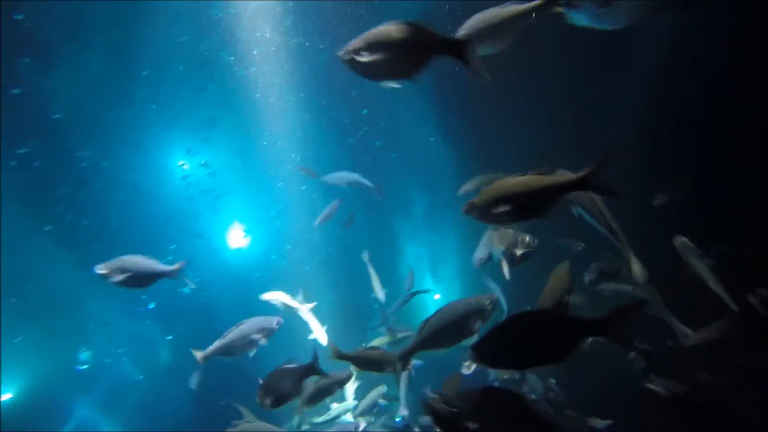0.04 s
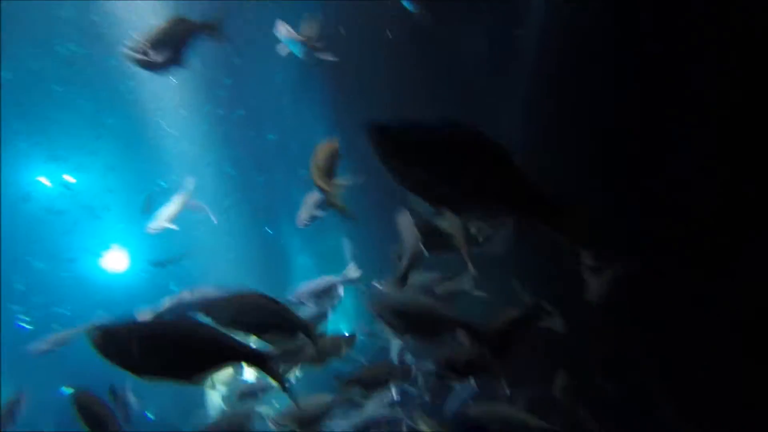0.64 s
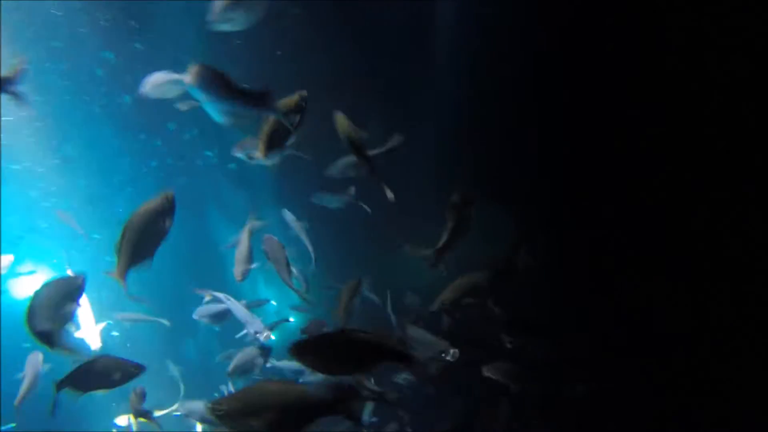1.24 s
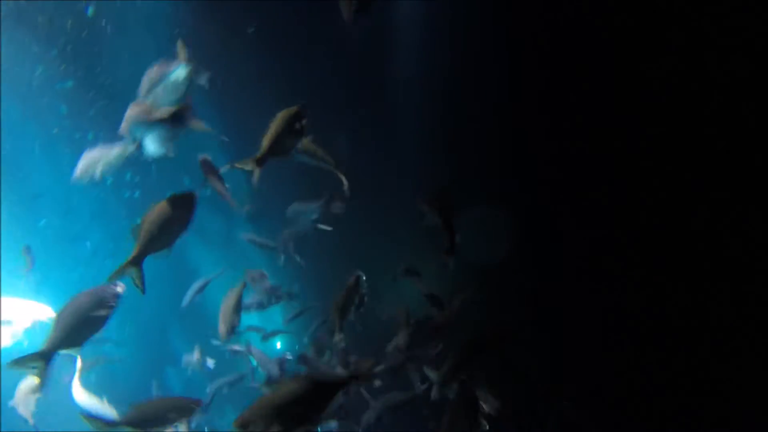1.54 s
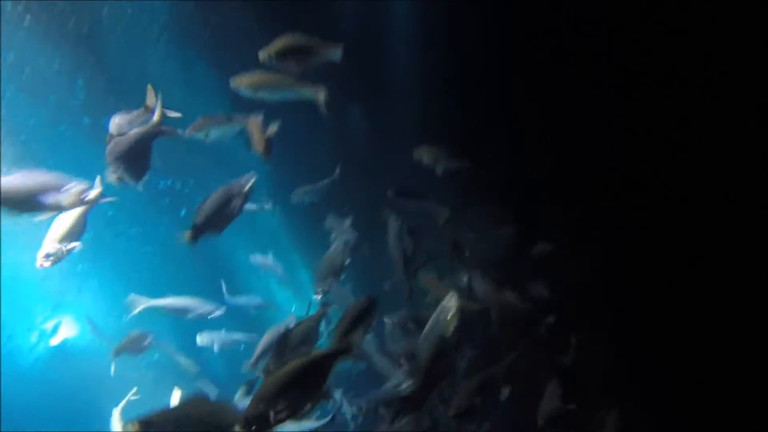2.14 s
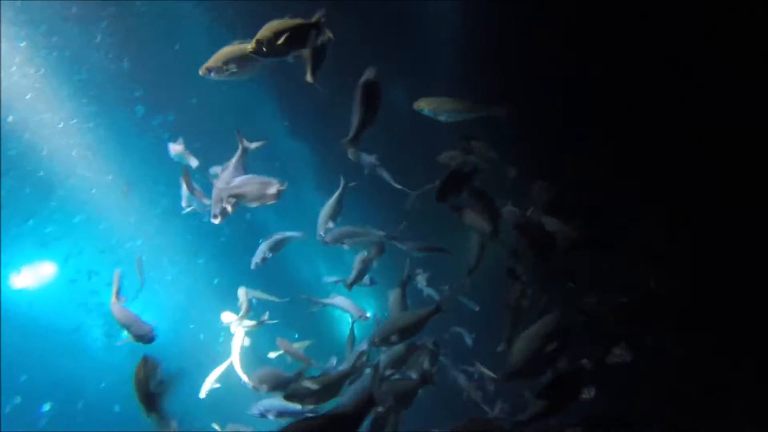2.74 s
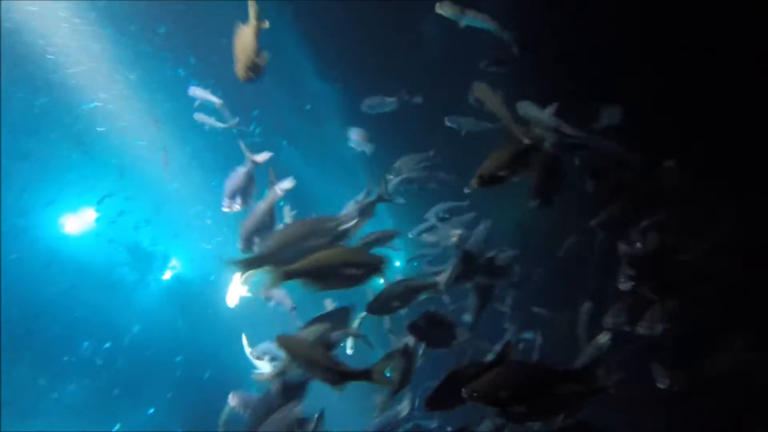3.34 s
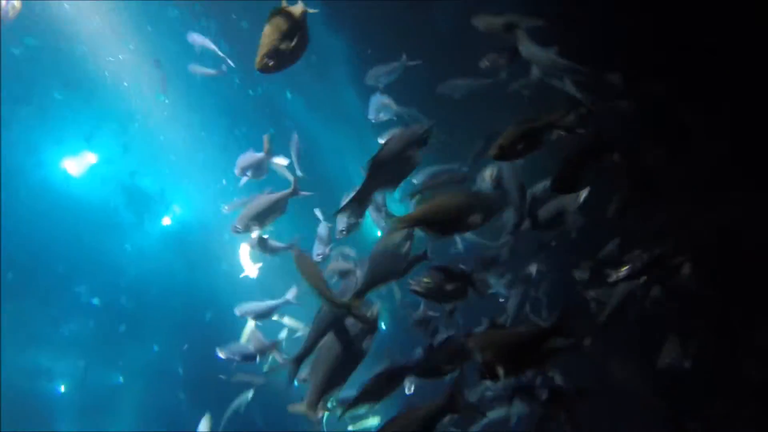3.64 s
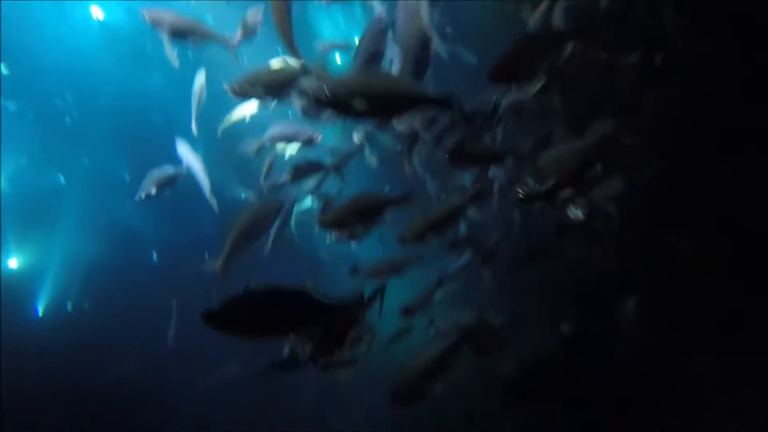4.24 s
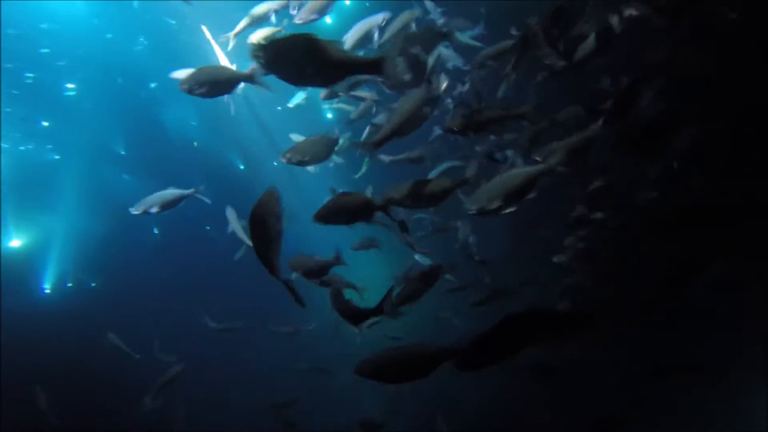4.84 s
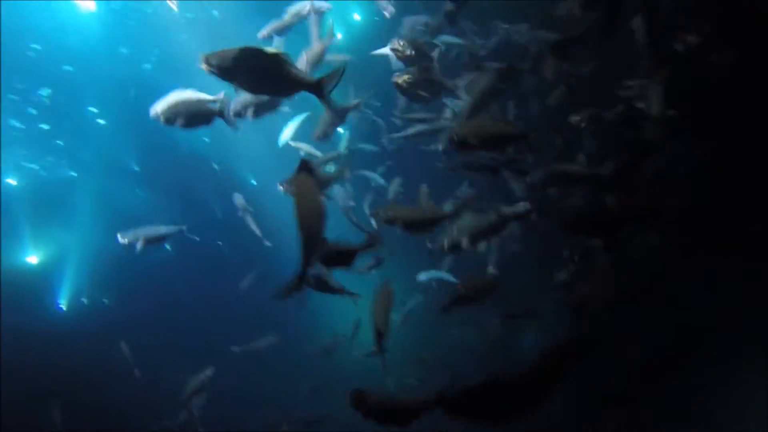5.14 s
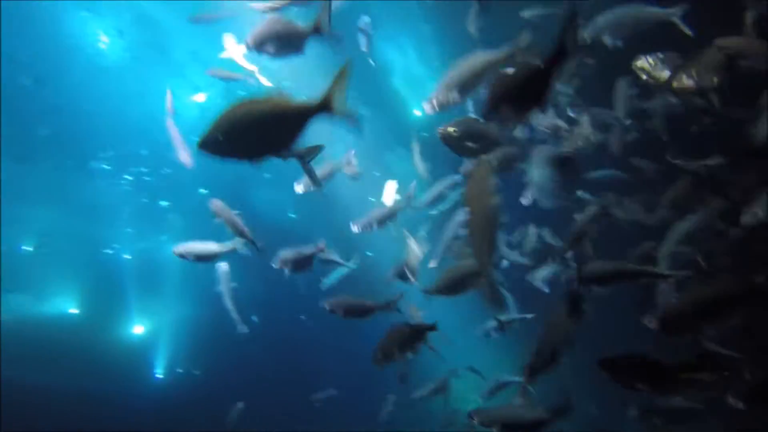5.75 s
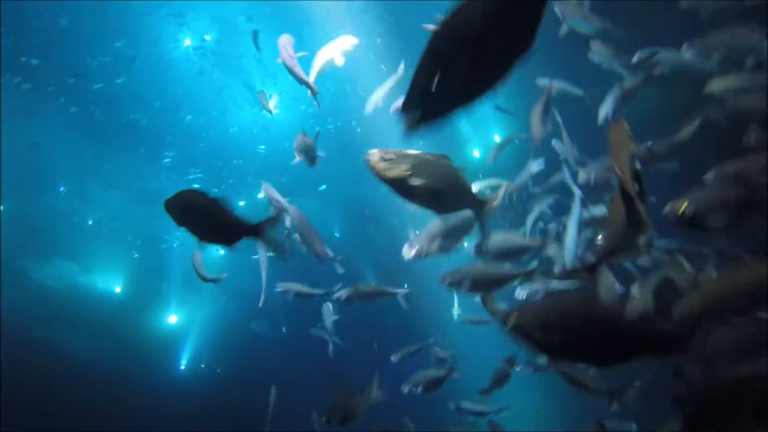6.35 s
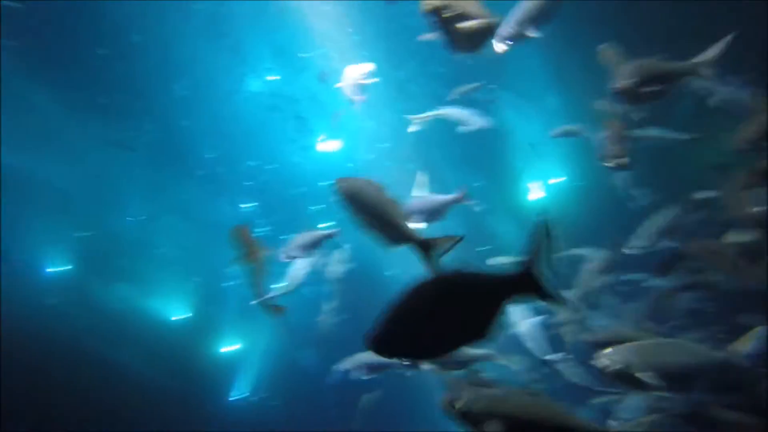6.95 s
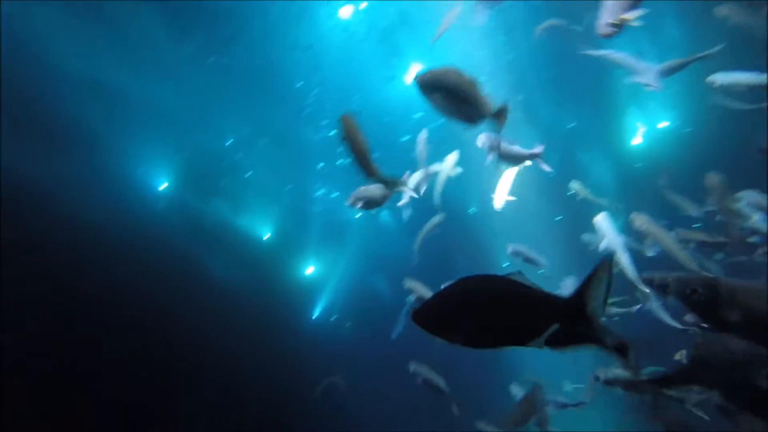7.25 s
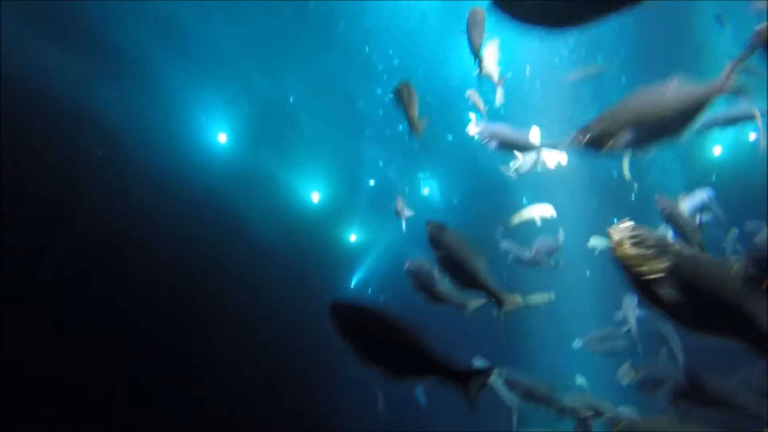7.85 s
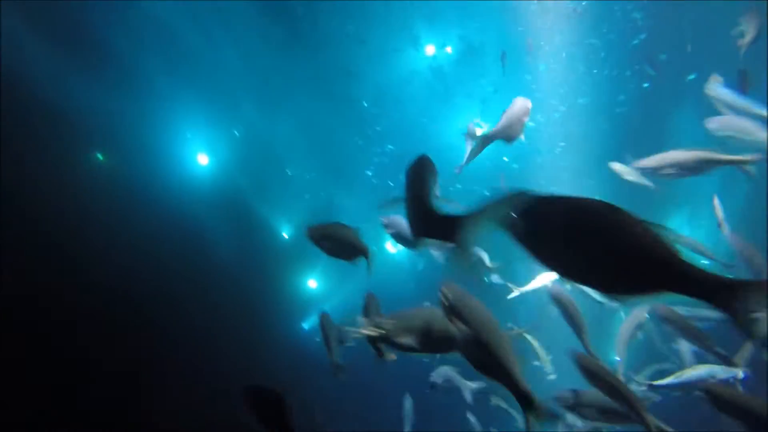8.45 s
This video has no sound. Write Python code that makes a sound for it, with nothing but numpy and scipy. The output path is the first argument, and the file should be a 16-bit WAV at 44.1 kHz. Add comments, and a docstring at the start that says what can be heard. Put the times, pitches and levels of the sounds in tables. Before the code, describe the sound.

Muffled underwater hum and rumble with fine shrimp crackle, tiny bubble pips and irregular sharp clicks on a camera housing.

```python
"""Sharp clicks and small knocks on the plastic housing of a camera, under the sea at night.
Each blow rings the shell's modes for a few hundredths of a second: a knock below, a crack on top.
Behind them lie a low hum, an even wash, the fine crackle of snapping shrimp and the pips of small
ringing bubbles. Water pushing on the camera rumbles with each swing and thumps with each jolt,
and the electronics inside whine faintly."""
import sys
import numpy as np
from scipy import signal
from scipy.fft import rfft, irfft, next_fast_len
from scipy.io import wavfile
from scipy.ndimage import map_coordinates

SR = 44100
rng = np.random.default_rng(int(sys.argv[2]) if len(sys.argv) > 2 else 0)


def generate_wav(sig):
    """Save sig (samples, or channels by samples) to the path in sys.argv[1] as 16-bit PCM at SR."""
    pcm = np.round(np.clip(np.atleast_2d(sig).T, -1, 1) * 32767).astype(np.int16)
    wavfile.write(sys.argv[1], SR, pcm)


N = 379260
TIME = np.arange(N) / SR
AGE = np.arange(int(0.12 * SR)) / SR  # seconds since the start of a short sound
DRIFT_DB = -55  # rumble while the camera only drifts

# tone colour of a shrimp's snap: f/Hz, gain/dB
SNAP_COLOUR = [(800, -4), (2000, 10), (4200, 12.5), (7000, 4.5), (10300, 4), (11300, -5), (15500, -14)]


def undb(db):
    """Decibels to gain."""
    return 10 ** (np.asarray(db) / 20)


def level(x, db):
    """Scale a steady sound to an rms level."""
    return x * undb(db) / np.sqrt(np.mean(x ** 2))


def burst_level(x, db, window_s=0.02):
    """Scale a short sound so that its energy, spread over the window, has this level."""
    return x * undb(db) / np.sqrt(np.sum(x ** 2) / (window_s * SR))


def colour(x, points):
    """Minimum-phase EQ through points of f/Hz, gain/dB."""
    size = 2 * next_fast_len(len(x))
    hz, db = np.transpose(points)
    freq = np.maximum(np.fft.rfftfreq(size, 1 / SR), 1)
    gain = undb(np.interp(np.log(freq), np.log(hz), db))
    cepstrum = irfft(np.log(gain))
    # folded onto positive time, so nothing rings ahead of an attack
    cepstrum[1:size // 2] *= 2
    cepstrum[size // 2 + 1:] = 0
    return irfft(rfft(x, size) * np.exp(rfft(cepstrum)))[:len(x)]


def bell_eq(x, hz, gain_db, width=1.36):
    """Boost or cut around one pitch; width is the frequency ratio to either edge."""
    return colour(x, [(hz / width, 0), (hz, gain_db), (hz * width, 0)])


def band(x, lo_hz, hi_hz, order=3):
    """Causal band-pass."""
    return signal.sosfilt(signal.butter(order, [lo_hz, hi_hz], "band", fs=SR, output="sos"), x)


def modes(x, table):
    """Resonances side by side; neighbouring modes swing in opposite directions."""
    return sum((-1) ** k * undb(db) * signal.lfilter(*signal.iirpeak(hz, hz / width, fs=SR), x)
               for k, (hz, width, db) in enumerate(table))


def walk(rate):
    """Smooth random drift with a spread near 1, turning about rate times a second."""
    steps = rng.standard_normal(N // 100)
    return np.interp(TIME * rate, np.arange(len(steps)), steps)


def hump(s, rise_s, fall_s):
    """A smooth rise to 1 at time s and a smooth fall."""
    return np.exp(-((TIME - s) / np.where(TIME < s, rise_s, fall_s)) ** 2)


def scatter(count):
    """Random moments spread over the whole scene: rows of t/s and two random shares from 0 to 1."""
    chance = rng.random((count, 3))
    chance[:, 0] = (np.arange(count) + chance[:, 0]) / count * N / SR
    return chance


def shower(rate, spread_db, cap_db):
    """About rate random pulses a second, many weak and a few strong."""
    size = undb(np.minimum(spread_db * rng.exponential(size=N), cap_db))
    return (rng.random(N) < rate / SR) * size * rng.choice([-1, 1], N)


def impact(t60, rattle, grain_db, delay_s=0.0019):
    """A sharp first blow, then uneven small contacts and reflections that build up and die away."""
    noise, grain = rng.standard_normal((2, len(AGE)))
    build = 1 - np.exp(-(AGE / delay_s) ** 2)
    decay = np.exp(-np.log(1000) * AGE / t60)
    push = noise * undb(grain_db * grain) * decay * build
    push *= rattle / np.sqrt(np.sum(push ** 2))
    push[0] += 1  # the first blow
    return push


def add(out, s, sound):
    """Mix a short sound in at time s."""
    start = max(int(s * SR), 0)
    out[start:start + len(sound)] += sound[:max(N - start, 0)]


def throb(s, hz, db, half_s):
    """A low tone that swells and fades around time s."""
    tone = np.sin(2 * np.pi * (hz * TIME + rng.random()))
    return np.sqrt(2) * undb(db) * hump(s, half_s, half_s) * tone


def motion_db():
    """Level of the rumble: the camera's swings add their power to its slow drift."""
    # swings of the camera: t/s at the fastest, rise/s, fall/s, level/dB
    swings = [(0.05, 0.15, 0.14, -60), (3.2, 0.56, 0.51, -51), (3.82, 0.13, 0.39, -45.5),
              (4.62, 0.31, 0.2, -49), (5.35, 0.33, 0.18, -47.5), (7.02, 0.017, 0.037, -49)]
    swing_power = sum(undb(db) ** 2 * hump(s, rise, fall) for s, rise, fall, db in swings)
    return 10 * np.log10(undb(DRIFT_DB) ** 2 + swing_power)


def rumble(buffet_db=1.0):
    """Water pushes on the moving camera: deep noise that rides each swing."""
    # tone colour of the flow: f/Hz, gain/dB
    flow_colour = [(5, -17), (14, 9.5), (26, 9), (42, -12), (70, -6.5), (130, -33), (400, -71)]
    flow = colour(rng.standard_normal(N), flow_colour)
    return level(flow, motion_db() + buffet_db * walk(6.1))


def hum(waver_db=3.5, waver_hz=3, centre_hz=125.56):
    """The water's broad, restless hum wanders in pitch; now and then it gathers into a throb."""
    # tone colour of the hum, peaking near centre_hz: f/Hz, gain/dB
    hum_colour = [(40, -10.5), (75, -12.5), (105, -7), (125, -0.5), (145, -4), (170, -9.5), (215, -18),
                  (320, -34.5), (600, -51.5)]
    # path the hum wanders along: t/s, f/Hz, level/dB
    path = [(0, 132.1, -52), (.7, 134.7, -54), (1.6, 131.4, -52.5), (2.2, 125.5, -54), (3.1, 124.6, -53.5),
            (4.4, 118.5, -55), (5.3, 117.7, -54), (6.1, 131, -55.5), (6.9, 114.9, -50.5), (7.5, 135.4, -55),
            (8.6, 128.6, -54)]
    # brief throbs: t/s, f/Hz, level/dB
    swells = [(.27, 125, -52), (.38, 130, -45), (.8, 126, -49.5), (2.49, 126, -41.5), (4.06, 134, -52),
              (6.61, 128, -49), (7.2, 110, -47), (7.52, 138, -43.5), (8.24, 134, -47)]
    times, pitches, levels = np.transpose(path)
    hz = np.interp(TIME, times, pitches) + waver_hz * walk(5)
    db = np.interp(TIME, times, levels) + waver_db * walk(8.3)
    drone = colour(rng.standard_normal(N), hum_colour)
    position = np.cumsum(hz / centre_hz)  # varispeed bends the drone's pitch
    bent = map_coordinates(drone, [position], order=1, mode="mirror")
    return level(bent, db) + sum(throb(*swell, half_s=0.024) for swell in swells)


def wash(db=-55.0):
    """The sea's even bed of broad noise."""
    # tone colour of the sea: f/Hz, gain/dB
    sea_colour = [(30, -1), (100, 6), (200, 2.5), (300, -1.5), (600, -6), (1100, -11.5), (1900, -9.5),
                  (3500, -14), (6000, -18.5), (8000, -29), (10500, -35), (11200, -29), (15500, -42)]
    return level(colour(rng.standard_normal(N), sea_colour), db)


def shrimp_bed(rest_db=-56.5, fizz_db=-14.0, flicker_db=3.0):
    """Countless far snaps merge in the housing's modes under a bright fizz, louder as the camera swings."""
    # resonances through which the housing hears the water: f/Hz, width/Hz, gain/dB
    housing = [(844, 204, 2), (1346, 127, 5.5), (1523, 88, 11), (1756, 77, -4), (2084, 116, 1.5),
               (2395, 370, 4.5), (3000, 240, -4), (4030, 470, -4), (5410, 410, -13), (6530, 590, -13.5),
               (7330, 540, -14), (7800, 380, -21.5), (9920, 940, -16)]
    far_snaps = shower(rate=2600, spread_db=2.0, cap_db=19.5)
    crackle = band(modes(far_snaps, housing), 430, 13200)
    fizz = colour(shower(rate=450, spread_db=3.8, cap_db=14), SNAP_COLOUR)
    swing_db = 0.34 * (motion_db() - DRIFT_DB)
    gain = undb(rest_db + swing_db + flicker_db * walk(12))
    return gain * (level(crackle, 0) + level(fizz, fizz_db))


def whine():
    """Thin steady tones from the camera's electronics."""
    # partials of the whine: f/Hz, level/dB
    tones = [(10645, -88), (10669, -89), (13187, -99)]
    return sum(level(np.sin(2 * np.pi * hz * TIME), db) for hz, db in tones)


def bubble(hz, db, cycles=36, glide=0.03, wobble=0.53, attack_s=0.012):
    """A small bubble rings for some dozens of cycles, fluttering in level and rising a little in pitch."""
    life = np.minimum(AGE * hz / cycles, 2)  # 1 where the decay reaches -60 dB
    phase = 2 * np.pi * np.cumsum(hz * (1 + glide * (life - .2))) / SR
    knots = AGE[::40]
    flutter = 1 + wobble * np.interp(AGE, knots, rng.standard_normal(len(knots)))
    attack = 1 - np.exp(-AGE / attack_s)
    decay = np.exp(-np.log(1000) * life)
    return burst_level(np.sin(phase) * flutter * attack * decay, db)


def bubbles(trim_db=-1, far_db=-60.0, range_db=5, far_hz=2000, db_per_octave=-5.0):
    """A few clear pips among many faint ones of random size; smaller bubbles are higher and weaker."""
    # the nearest bubbles: t/s, f/Hz, level/dB before the trim
    near_bubbles = [(0.114, 2460, -50), (.666, 1490, -52.5), (3.034, 1800, -55), (3.083, 3270, -56),
                    (3.31, 2310, -51.5), (3.484, 2210, -51.5), (3.696, 860, -51.5), (3.7, 1500, -52),
                    (3.87, 1520, -51.5), (4.056, 2140, -45), (4.081, 2180, -50), (5.427, 1510, -52),
                    (6.028, 1723, -54), (6.525, 1340, -50), (7.575, 1410, -49), (7.737, 1410, -50.5)]
    out = np.zeros(N)
    for s, hz, db in near_bubbles:
        add(out, s, bubble(hz, db + trim_db))
    for s, smallness, strength in scatter(count=120):
        octaves = 0.61 * (2 * smallness - 1)
        db = far_db + db_per_octave * octaves + range_db * (strength - .5)
        add(out, s, bubble(far_hz * 2 ** octaves, db))
    return out


def snap(db, hz, lift_db):
    """A shrimp's bubble collapses with a thin, very short tick."""
    collapse = impact(t60=0.011, rattle=2.0, grain_db=-3.0, delay_s=0.00041)
    tick = colour(collapse[:len(AGE) // 8], SNAP_COLOUR)
    return burst_level(bell_eq(tick, hz, lift_db), db)


def snaps(far_db=-66.0, spread_db=0.2, cap_db=1.0, low_hz=4000, spread_octaves=1.44, count=240):
    """The nearest shrimp snap singly; many more tick faintly further off, each with its own colour."""
    # the nearest snaps: t/s, level/dB, bell f/Hz, bell gain/dB
    near_snaps = [(0.1334, -56.5, 4200, 6), (.205, -66, 4500, -5), (0.219, -60, 9300, 14),
                  (.331, -60, 2700, 24), (.381, -67, 6500, 4), (0.424, -61.5, 4500, 6),
                  (1.115, -58, 4200, 8), (1.4052, -53.5, 4340, 10), (1.627, -54, 4300, 4),
                  (1.676, -55, 4400, 16), (1.779, -60, 7000, 4), (1.808, -52.5, 3900, 0),
                  (2.087, -60.5, 6600, 20), (2.186, -58, 4040, 16), (2.241, -59, 4000, 14),
                  (2.369, -57, 4300, -6), (2.398, -58, 4200, 3), (2.8587, -57, 4500, -3),
                  (3.128, -56.5, 4000, 18), (3.1612, -49.5, 7300, 17), (3.177, -58, 4300, 6),
                  (3.297, -56.5, 3000, -7), (3.3885, -55.5, 3870, 5), (3.471, -56, 4300, 2),
                  (4.367, -56.5, 4220, -7), (4.83, -56.5, 4200, 9), (4.975, -59.5, 4300, 1),
                  (4.998, -55.5, 4150, -15), (5.069, -58, 4300, -2), (5.2282, -54, 4320, 0),
                  (5.604, -56, 7000, 3), (5.671, -61, 6500, -3), (5.75, -57, 8500, 7),
                  (6.295, -57.5, 8000, -3), (6.367, -53.5, 3840, 29), (6.4447, -57.5, 9000, 9),
                  (6.478, -60, 7000, 5), (6.576, -57.5, 3900, -11), (6.607, -59.5, 4470, -2),
                  (6.62, -57.5, 7000, 7), (7.4324, -54, 5630, 6), (7.446, -53.5, 9700, 13),
                  (7.666, -59, 5200, 11), (7.699, -58, 5500, 3), (7.897, -53.5, 3800, 12),
                  (7.907, -57, 5190, 9), (7.933, -57, 4000, -1), (7.992, -56.5, 4820, 4),
                  (8.0973, -59, 4000, 4), (8.13, -54, 5340, 8), (8.226, -61, 8500, 7),
                  (8.293, -58, 4050, 17), (8.552, -60, 6600, 10), (8.5675, -56.5, 7500, 6)]
    out = np.zeros(N)
    for s, db, hz, lift_db in near_snaps:
        add(out, s, snap(db, hz, lift_db))
    for when, strength, brightness in rng.random((count, 3)):
        db = far_db + min(-spread_db * np.log(1 - strength), cap_db)
        hz = low_hz * 2 ** (spread_octaves * brightness)
        add(out, when * N / SR, snap(db, hz, lift_db=9))
    return out


def click(db, lower_hz, lower_db, upper_hz, upper_db, crack_db, crack_hz, t60):
    """A blow rings the shell: a knock in the lower modes and a shorter crack in the upper ones."""
    # modes of the plastic shell: f/Hz, width/Hz, gain/dB
    shell = [(860, 130, -9.2), (1060, 160, -5), (1430, 180, 0.4), (1780, 170, 0.6), (2020, 100, -0.8),
             (2340, 150, 0.1), (2610, 210, -1.3), (3060, 190, -5), (3600, 260, -14.8), (3970, 380, -12.5),
             (4330, 380, -14.5), (4990, 220, -13.5), (5280, 190, -11), (5950, 300, -17), (6540, 450, -19),
             (7400, 600, -23), (8570, 850, -20), (9400, 700, -29), (10300, 900, -28), (11950, 600, -31.5),
             (12900, 900, -39), (14300, 1200, -42)]
    split_hz, hard_db = 3800, -44
    knock_modes = [mode for mode in shell if mode[0] < split_hz]
    # the upper modes lie a little differently for every blow
    crack_modes = [(hz * (1 + .01 * rng.standard_normal()), width, gain_db)
                   for hz, width, gain_db in shell if hz >= split_hz]
    rattle = (t60 / .03) ** .7  # a short click is mostly first blow, a long one mostly rattle
    knock = modes(impact(t60, rattle, grain_db=2.5), knock_modes)
    # where the blow lands decides which modes speak most
    knock = bell_eq(knock, lower_hz, lower_db)
    knock = bell_eq(knock, upper_hz, upper_db)
    knock = burst_level(band(knock, 520, 5500, order=2), 0)
    crack = modes(impact(0.93 * t60, rattle, grain_db=1.5), crack_modes)
    crack = bell_eq(crack, crack_hz, gain_db=8, width=1.25)
    # a harder blow reaches further up into the treble
    bright_db = 0.8 * max(db + crack_db - hard_db, 0)
    tilt = [(4200, -0.26), (6200, bright_db / 2), (8500, bright_db - .5), (13000, bright_db - 3.5)]
    crack = colour(crack, tilt)
    crack = burst_level(band(crack, 2000, 13000, order=2), crack_db)
    return undb(db) * (knock + crack)


def clicks(faint_db=-57, range_db=4, spread_octaves=0.21):
    """Loud clicks on the housing, with a few faint rattles scattered among them."""
    # blows on the housing: t/s, knock level/dB, lower bell f/Hz, its gain/dB, upper bell f/Hz,
    # its gain/dB, crack level/dB re the knock, crack f/Hz, rattle t60/s
    blows = [(0.708, -54, 2400, 17, 3500, 11, -5, 4200, 0.035),
             (1.0252, -37.5, 1160, 10, 3100, 4.5, -16, 4050, 0.01),
             (1.027, -45, 1460, -8, 2700, -5, -18, 4100, 0.021),
             (1.252, -54.5, 1447, 0, 2600, 15, -12, 4200, 0.013),
             (1.32, -50.5, 2360, 24, 3500, 18, -6, 4000, 0.086),
             (1.414, -49.5, 2320, 16, 3320, 22, -1.5, 4100, 0.089),
             (1.593, -47.5, 1200, 15, 3080, 15, -15, 4000, 0.03),
             (1.5976, -41.5, 1300, 8, 2470, 9, -18, 4000, 0.015),
             (1.7254, -40.5, 1550, 2, 2780, 16, -5, 4340, 0.011),
             (1.7362, -43, 1260, 10, 2740, 10, -10, 4000, 0.04),
             (1.813, -56, 2260, 17, 3000, 13, -12, 6500, 0.012),
             (1.909, -51, 853, 4, 2870, 21, -6, 4220, 0.074),
             (2.351, -45.5, 980, 7.5, 1530, -1, -18, 4000, 0.029),
             (2.635, -46.5, 945, 11, 2740, 10, -15, 4250, 0.0097),
             (2.6787, -39.5, 1090, 6.5, 2260, 6, -27, 4000, 0.031),
             (3.1362, -36.5, 1040, 6, 1240, 9, -14, 4900, 0.011),
             (3.558, -43.5, 1120, 13, 2400, 10, -19, 6400, 0.14),
             (3.778, -41, 990, 9, 3020, 6, -19, 5000, 0.078),
             (3.904, -49.5, 1080, 12, 1600, 0, -29, 4200, 0.016),
             (4.1555, -30.5, 1140, 7.5, 2360, 13.5, -21, 4100, 0.014),
             (4.182, -38.5, 1310, 5, 2920, 7, -21, 3940, 0.013),
             (4.374, -46, 2400, 12, 3170, 11, -11, 4100, 0.0045),
             (4.4635, -34.5, 840, 11.5, 1270, 7.5, -14.5, 5560, 0.029),
             (4.5468, -38, 850, 8, 1350, 5, -21.5, 5600, 0.056),
             (4.738, -49.5, 1600, 3, 2500, 4, -7, 5200, 0.099),
             (4.754, -46.5, 853, 7, 3020, 8, -8, 5300, 0.16),
             (4.7879, -25.5, 710, 9, 1870, 4, -18, 5150, 0.02),
             (4.797, -35.5, 860, 9, 1850, 13, -16.5, 5100, 0.027),
             (5.086, -39.5, 1080, 6, 3170, 1, -14, 5240, 0.031),
             (5.27, -45.5, 2250, 7, 2880, 8, -8, 4070, 0.014),
             (5.315, -46.5, 2350, 7, 3100, 7, -14, 4000, 0.02),
             (5.3537, -28.5, 1800, 7, 3500, 12, -3, 5300, 0.0085),
             (5.357, -34.5, 1080, 9, 1920, 5, -10, 5300, 0.02),
             (5.828, -53, 2370, 14, 3520, 15, -5.5, 4200, 0.019),
             (6.179, -39.5, 910, 20, 2220, 12, -20, 10000, 0.05),
             (6.1827, -39.5, 1350, 10, 1870, 17, -35, 4000, 0.024),
             (6.228, -52.5, 1500, 9, 2250, 19, -9, 7000, 0.075),
             (6.259, -42, 1500, 20, 2650, 17.5, -7.5, 4070, 0.018),
             (6.339, -45, 1080, 13, 1450, 23, -27, 4200, 0.032),
             (6.348, -43, 1050, 16, 3500, 5, -17, 4000, 0.013),
             (6.738, -55, 2600, 3, 3030, 18, -18, 4200, 0.061),
             (6.905, -49, 2400, 12, 3500, 5, -7, 4100, 0.15),
             (7.025, -52.5, 2740, 21, 3500, 6, -1, 4900, 0.014),
             (7.119, -52, 1660, 7, 2400, -2, -23, 4200, 0.023),
             (7.358, -57.5, 1680, 23, 3515, 24, 7.5, 4370, 0.016),
             (7.413, -47.5, 2360, 24, 3500, 13, -11, 4100, 0.069),
             (7.488, -32, 1390, -3.5, 2110, 1.5, -7.5, 5170, 0.019),
             (7.5011, -35.5, 1406, 0, 2287, 3, -19, 4900, 0.04),
             (7.5106, -40.5, 1390, 4, 2700, -2, -18, 5200, 0.07),
             (7.624, -42.5, 1160, 19, 3070, 9, -7.5, 5100, 0.051),
             (7.652, -39.5, 1100, 3, 2200, 4, -19, 5290, 0.024),
             (7.683, -47.5, 1440, 15, 2750, 16, -6.5, 4400, 0.18),
             (8.061, -43.5, 1220, 17, 1610, 2, -11.5, 10200, 0.032),
             (8.484, -31.5, 1600, 3, 2300, 8.5, -14.5, 5340, 0.013),
             (8.4927, -38, 1520, 6, 2280, 12, -20, 5250, 0.039),
             (8.499, -37.5, 1530, 5, 2100, 10, -25, 5250, 0.073),
             (8.522, -40, 890, 10, 1200, 10, -6, 5400, 0.058),
             (8.556, -36.5, 1420, 10.5, 2150, 9, -25, 5300, 0.031)]
    out = np.zeros(N)
    for s, *blow in blows:
        add(out, s, click(*blow))
    for s, pitch, strength in scatter(count=8):
        shift = 2 ** (spread_octaves * (2 * pitch - 1))
        db = faint_db + range_db * (strength - .5)
        add(out, s, click(db, lower_hz=1450 * shift, lower_db=3, upper_hz=2450 * shift, upper_db=8,
                          crack_db=-7, crack_hz=4300 * shift, t60=0.064))
    return out


def jolts(half_cycles=0.46):
    """Soft, deep thumps of about one cycle as the camera is pulled through the water."""
    # jolts of the camera: t/s, f/Hz, level/dB
    thumps = [(3.3, 58, -53), (3.76, 25, -39.5), (3.8, 45, -37), (3.88, 24, -40.5), (3.99, 25, -46),
              (4.15, 27, -38.5), (4.45, 22, -55), (4.45, 66, -45.5), (4.715, 26, -39.5), (6.61, 58, -45),
              (7.03, 32, -44.5)]
    return sum(throb(s, hz, db, half_s=half_cycles / hz) for s, hz, db in thumps)


def scene():
    """Everything reaches one microphone inside the housing."""
    bed = rumble() + hum() + wash() + shrimp_bed() + whine()
    return (bed + bubbles() + snaps() + clicks() + jolts())[None]


def record(dry):
    """The camera cuts the top with a steep low-pass."""
    top_hz = 15500
    return signal.sosfilt(signal.ellip(10, .2, 70, top_hz, fs=SR, output="sos"), dry)


dry = scene()
out = record(dry)
generate_wav(out)
```